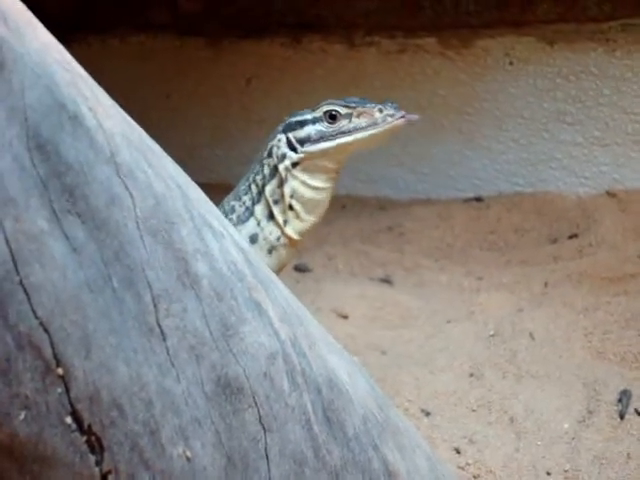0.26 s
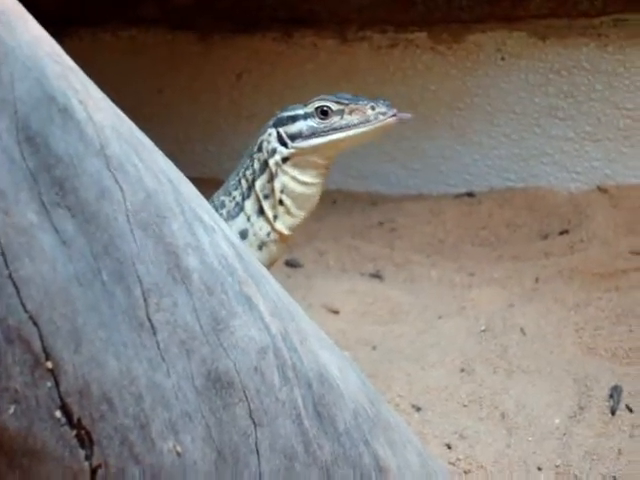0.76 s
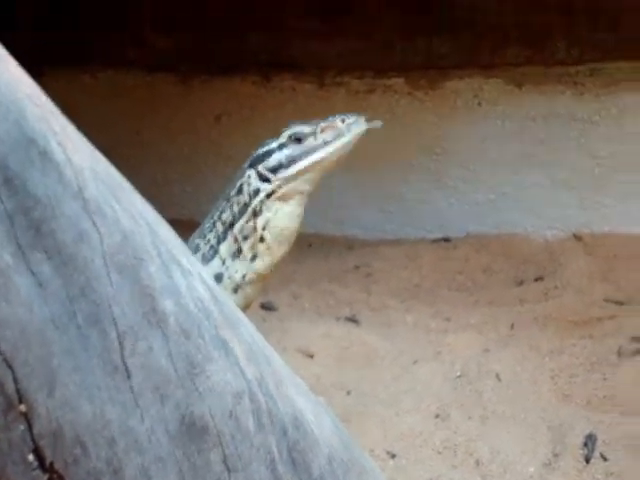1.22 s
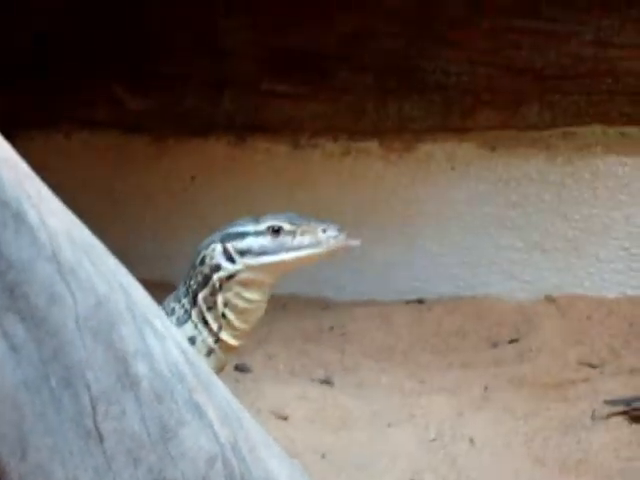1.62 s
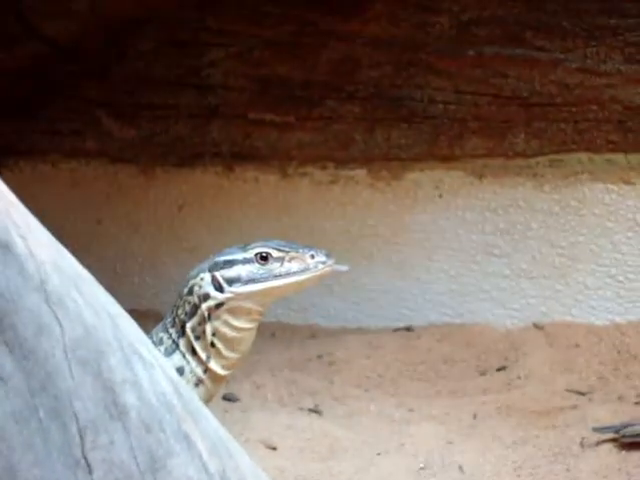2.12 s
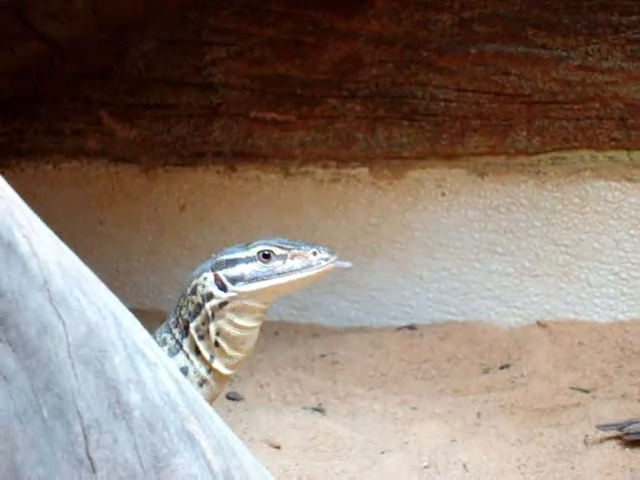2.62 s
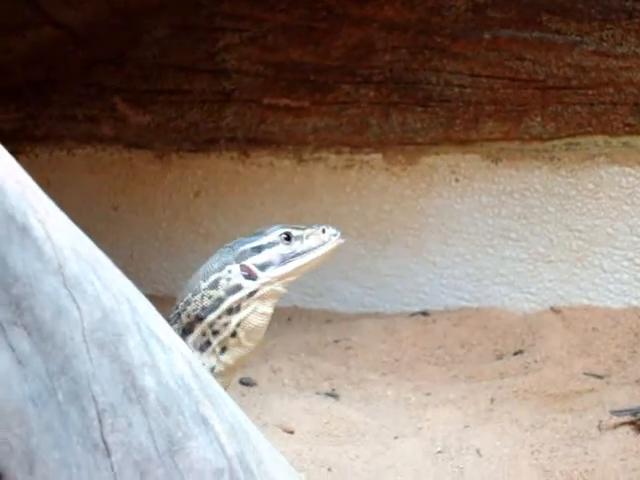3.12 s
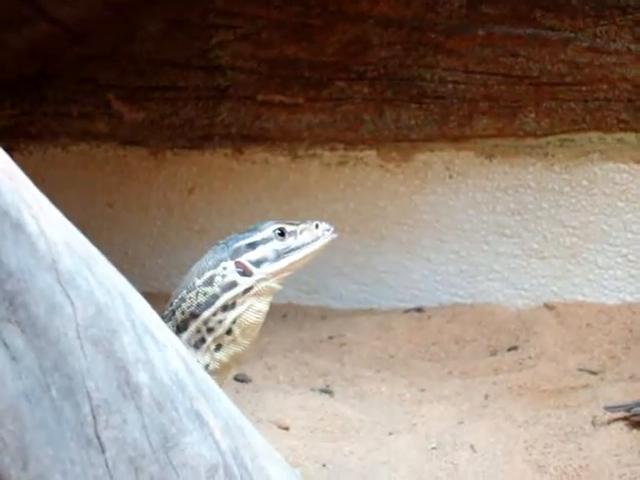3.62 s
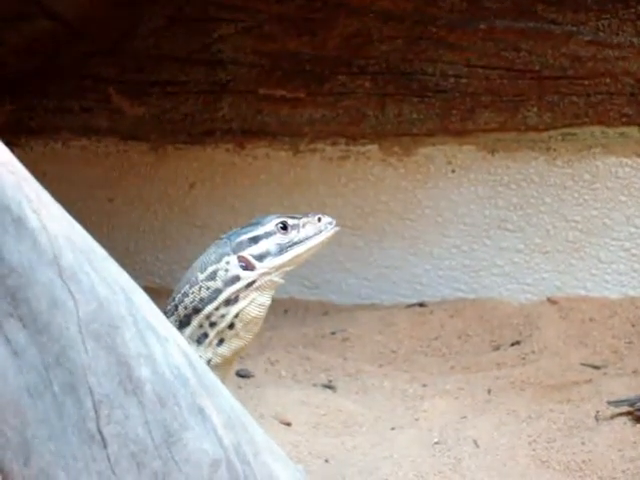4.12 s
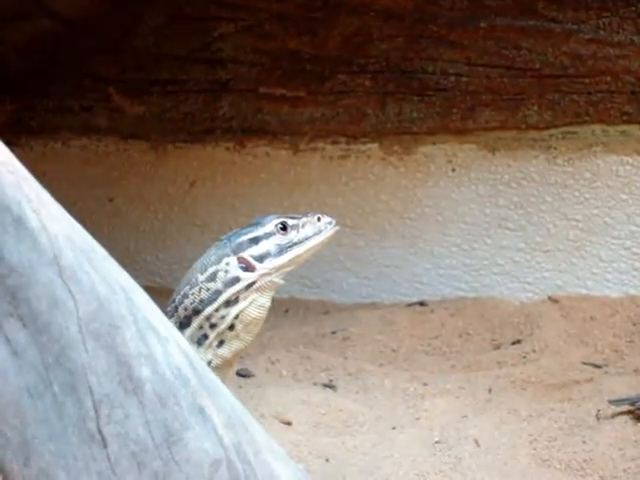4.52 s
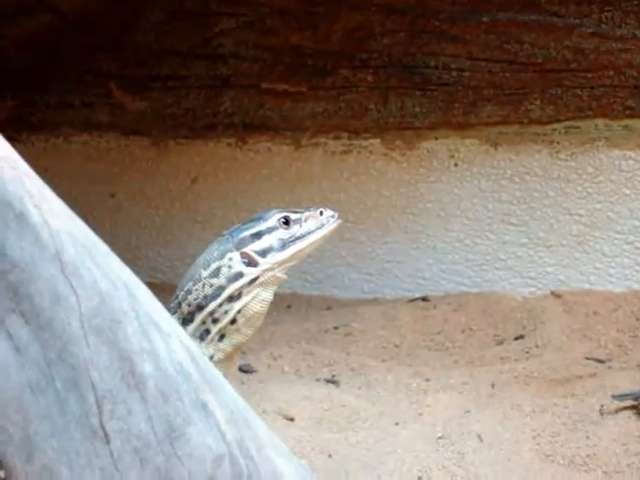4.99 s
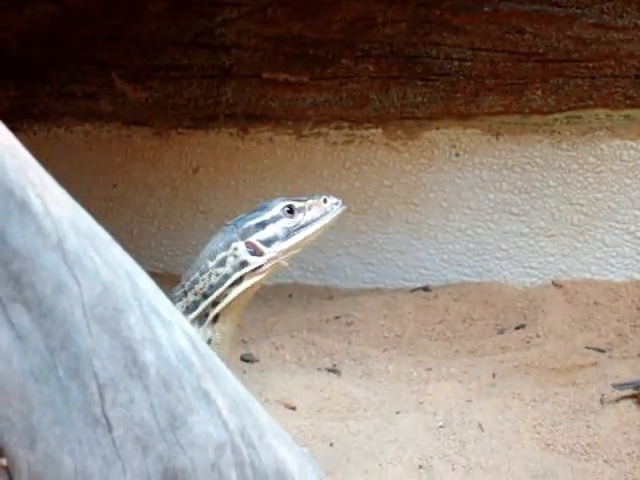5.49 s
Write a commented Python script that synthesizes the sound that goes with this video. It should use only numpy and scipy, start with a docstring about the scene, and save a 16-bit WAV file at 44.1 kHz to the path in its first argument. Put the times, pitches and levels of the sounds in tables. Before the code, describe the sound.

A quiet indoor reptile enclosure with sand and wood, lasting about 5.7 seconds. A close cricket dominates, chirping at about 0.2, 1.0, 1.4, 1.85 (weaker), 2.4, 3.1, 3.7, 4.4, 5.05 and 5.6 seconds. Each chirp is two or three rapid pulses, roughly twenty a second, near 4.9 kilohertz; each pulse glides slightly downward with a fine rasp, the first softer and usually lower. A second, fainter cricket answers at about 0, 0.65, 1.4, 2.2, 2.8, 3.5, 4.1 and 5.1 seconds, its pulses joined by room echo. Still fainter, mostly higher chirps are scattered between, notably around 0.8, 2.5 and 4.4 to 4.7. Soft steady ventilation air continues throughout. Barely noticeable scuffs come near 0.8, 1.2, 1.55 and 5.45. A faint low drone swells between 4.5 and 5.5. The sound is slightly thin and digital, with faint mirrored overtones.

```python
"""A cricket chirps close by in a reptile enclosure, two or three wing strokes at a time: gliding tones with a rasp.
Other crickets chirp farther off in a quiet room, their strokes blurred by a fading tail of noise-like echoes.
Filtered noise and faint tones make the soft ventilation, and narrow noise makes a low drone that swells.
Short bursts of grainy noise scuff faintly on sand and wood.
The recorder holds each sample, which mirrors the chirps into faint higher and lower tones."""
import sys
import numpy as np
from scipy import signal
from scipy.fft import rfft, irfft, next_fast_len
from scipy.io import wavfile
from scipy.ndimage import map_coordinates

SR = 44100
rng = np.random.default_rng(int(sys.argv[2]) if len(sys.argv) > 2 else 0)


def master_out(mix):
    """Clip the mix to full scale and print it as 16-bit PCM to the path in sys.argv[1]."""
    frames = np.transpose(np.atleast_2d(mix))
    ceiling = np.clip(frames, -1, 1)
    pcm = np.round(ceiling * 32767).astype(np.int16)
    wavfile.write(sys.argv[1], SR, pcm)


N = 253575  # length of the scene in samples


def amp(db):
    """Turn decibels into a gain."""
    return 10 ** (np.asarray(db) / 20)


def unit(x):
    """Scale a sound to an rms of 1."""
    return x / np.sqrt(np.mean(x ** 2) + 1e-20)


def add(track, s, sound):
    """Mix a sound into a track from time s, cutting off whatever falls outside."""
    start = round(s * SR)
    sound = sound[max(-start, 0):]
    part = track[max(start, 0):][:len(sound)]
    part += sound[:len(part)]


def wobble(rate, size):
    """A smooth random curve through `rate` random points a second."""
    points = rng.standard_normal(int(size * rate / SR) + 4)
    return map_coordinates(points, [np.arange(size) * rate / SR + 1])


def filtered(x, response):
    """Make each frequency of x louder or softer by the gain response(f)."""
    size = next_fast_len(len(x) + 8192)  # spare room for the filter's ringing
    gain = response(np.fft.rfftfreq(size, 1 / SR))
    return irfft(rfft(x, size) * gain, size)[:len(x)]


# color of the air rush: f/Hz, relative level/dB (per Hz)
AIR_COLOR = [(15, -51), (25, -23), (54, -19.5), (120, -10), (217, -2.5), (458, -0.5), (559, -1.5),
             (811, -2.5), (1590, -6.5), (2090, -7.5), (3430, -10), (4740, -14), (6380, -10.5), (7050, -13),
             (9500, -16), (12400, -31), (20900, -120)]
# fan tones: f/Hz, level/dB
FAN_TONES = [(1491, -70), (2017, -70), (7585, -66)]


def ventilation():
    """A nearly steady rush of air, which is noise, with a few faint, slightly unsteady fan tones."""
    hz, db = np.transpose(AIR_COLOR)

    def color(f):
        level = amp(np.interp(np.log(f + 1), np.log(hz), db))
        return level / np.hypot(1, (f / 10000) ** 20)  # steep fall above 10 kHz

    rush = unit(filtered(rng.standard_normal(N), color))
    tones = np.zeros(N)
    for pitch, level in FAN_TONES:
        rate = pitch + 3 * wobble(12, N)
        tones += amp(level) * unit(np.sin(2 * np.pi * np.cumsum(rate) / SR))
    return amp(-48.5 + 0.44 * wobble(3.16, N)) * rush + tones


DRONE_DB, SWELL_S = -76, 0.075  # steady level; time from a swell's peak to its fall to 1/e
# swells of the building's low drone: t/s (of the peak), level/dB (added to the steady drone)
DRONE_SWELLS = [(4.47, -64), (4.88, -66), (5.17, -65), (5.53, -59.5)]


def drone():
    """A low rumble of noise in a narrow band, which swells a few times."""
    t = np.arange(N) / SR
    level = amp(DRONE_DB)
    for s, db in DRONE_SWELLS:
        level = level + amp(db) * np.exp(-((t - s) / SWELL_S) ** 2)
    # band around 124 Hz
    noise = filtered(rng.standard_normal(N), lambda f: 1 / (1 + ((f - 124) / 14) ** 2))
    return level * unit(noise)


GRIP_S, RELEASE_S = 0.0059, .0012  # the scraper takes hold gradually and lets go at once
# course of one wing stroke: share of its length, tooth rate ratio, relative level/dB
STROKE_COURSE = [(0, 1.045, -11.5), (0.249, 1.025, 0), (.5, .99, 1.5), (.8, .965, 0), (1, 0.955, 0)]


def stroke(length, hz, slip, lumpy_db, glide=1):
    """The scraper runs along the file and slows; uneven tooth strikes make the wing tone waver and flutter."""
    size = int(length * SR)
    u = np.linspace(0, 1, size)  # share of the stroke done
    at, ratio, db = np.transpose(STROKE_COURSE)
    rate = hz * np.interp(u, at, ratio) ** glide * (1 + slip * wobble(806.0, size))
    edges = np.clip(np.minimum(u / GRIP_S, (1 - u) / RELEASE_S) * length, 0, 1)
    flutter = np.tanh(wobble(594, size))
    level = edges * amp(np.interp(u, at, db) + lumpy_db * flutter)
    return unit(level * np.sin(2 * np.pi * np.cumsum(rate) / SR))


def rasp(tone, rasp_db):
    """Broad scraping noise around 4700 Hz that follows the strength of the tone."""
    grit = filtered(rng.standard_normal(len(tone)), lambda f: 1 / np.hypot(1, (f - 4700) / 700))
    strength = np.abs(signal.hilbert(tone))
    return tone + amp(rasp_db) * strength * unit(grit)


def chirp(s, period, hz, db, lead_ratio, lead_db, count):
    """Evenly spaced strokes (s, tooth rate Hz, dB): a hesitant first one, then full ones."""
    first = (s, hz * lead_ratio, db + lead_db)
    return [first] + [(s + k * period, hz, db) for k in range(1, round(count))]


def room(x, t60, wet_db):
    """Direct sound plus a diffuse tail that falls 60 dB in t60 seconds, at about unchanged energy."""
    t = np.arange(int(.7 * SR)) / SR
    build_up = 1 - np.exp(-t / 0.014)
    echoes = rng.standard_normal(len(t)) * amp(-60 * t / t60) * build_up
    tail = signal.fftconvolve(x, echoes)
    heard = amp(wet_db) * tail * np.linalg.norm(x) / np.linalg.norm(tail)
    heard[:len(x)] += x
    return heard / np.hypot(1, amp(wet_db))


def distant_stroke(hz, wet_db):
    """A stroke from farther off, with a smaller glide and a strong flutter, blurred by the room."""
    tone = stroke(0.0317, hz, slip=0.022, lumpy_db=9, glide=0.33)
    return room(rasp(tone, rasp_db=-19.5), t60=0.4, wet_db=wet_db)


SECOND_LEAD_RATIO, SECOND_LEAD_DB = 0.94, -12.5  # its first stroke is slower and barely sounded
# three-stroke chirps of a second cricket farther off:
# t/s, stroke period/s, tooth rate f/Hz, level/dB, room over direct sound level/dB
SECOND_CRICKET_CHIRPS = [(-.046, 0.041, 4860, -29.5, 0.5), (.649, .05, 4883, -30, -5),
                         (1.36, 0.061, 4907, -33.5, -2), (2.163, 0.059, 4833, -32.5, -3),
                         (2.757, .053, 4856, -31.5, 0.5), (3.452, .05, 4880, -32.5, -0.5),
                         (4.062, 0.05, 4843, -33, 1.5), (5.108, 0.049, 4844, -33.5, 2)]


def second_cricket():
    """A faint lead-in and two full strokes, which the room joins into one trill."""
    song = np.zeros(N)
    for start, period, pitch, level, wet_db in SECOND_CRICKET_CHIRPS:
        for s, hz, db in chirp(start, period, pitch, level, SECOND_LEAD_RATIO, SECOND_LEAD_DB, count=3):
            add(song, s, amp(db) * distant_stroke(hz, wet_db))
    return song


# reflections inside the enclosure: delay t/s (before a small random shift), level/dB (against direct sound)
WALL_ECHOES = [(.0029, -15.5), (.0061, -13.5), (.0094, -11), (0.0125, -5.5)]


def walls(x):
    """Close walls return late copies, which beat with the gliding tone and break it into a fine rasp."""
    heard = np.pad(x, (0, SR // 50))
    for delay, db in WALL_ECHOES:
        add(heard, delay + rng.normal(0, .0003), amp(db) * x)
    return heard * np.linalg.norm(x) / np.linalg.norm(heard)  # same energy as before


LEAD_S, STROKE_S = .0185, .0255  # length of the first stroke and of the full ones
REOPEN_S, REOPEN_DB = .011, -8  # the wings reopen this long after a stroke, with a weak blip
# chirps of the near cricket, whose first stroke is slower and softer:
# t/s, wing strokes, stroke period/s, middle tooth rate f/Hz, level/dB,
# first stroke's rate ratio, first stroke's relative level/dB
NEAR_CRICKET_CHIRPS = [(.235, 3, 0.047, 5003, -24.5, 0.91, -6), (1.010, 2, 0.044, 4880, -24.5, .96, -3.5),
                       (1.398, 2, 0.05, 4910, -22.5, .96, -5.5), (1.847, 3, .044, 4895, -28.5, .995, -9.5),
                       (2.407, 3, 0.048, 4880, -24, 0.93, -7.5), (3.075, 3, 0.049, 4886, -25, 0.95, -7),
                       (3.662, 3, .0515, 4890, -24.5, 0.95, -4), (4.367, 3, .0515, 4880, -24, 0.98, -5),
                       (5.044, 3, .0495, 4872, -24, .945, -7.5), (5.635, 2, 0.048, 4860, -24, 0.97, -4)]


def near_cricket():
    """Each closing sounds both wings, which beat into a rasp; their reopening adds a short weak blip."""
    song = np.zeros(N)
    for start, count, period, pitch, level, lead_ratio, lead_db in NEAR_CRICKET_CHIRPS:
        strokes = chirp(start, period, pitch, level, lead_ratio, lead_db, count=count)
        for k, (s, hz, db) in enumerate(strokes):
            length = STROKE_S if k else LEAD_S
            # the two wings sound slightly apart in pitch
            file_wing = stroke(length, .987 * hz, slip=.022, lumpy_db=3)
            scraper_wing = stroke(length, 1.022 * hz, slip=.022, lumpy_db=3, glide=.3)
            closing = walls(unit(file_wing + amp(0.5) * scraper_wing))
            opening = stroke(.006, hz, slip=.022, lumpy_db=7, glide=.3)
            add(song, s, amp(db) * rasp(closing, rasp_db=-25))
            add(song, s + length + REOPEN_S, amp(db + REOPEN_DB) * opening)
    return song


# stroke period, change from stroke to stroke, room over direct sound
FAR_PERIOD_S, FAR_FADE_DB, FAR_WET_DB = .053, -1.4, 0.5
# chirps of the farthest, higher crickets: t/s, wing strokes, tooth rate f/Hz, level/dB (of the first stroke)
FAR_CRICKET_CHIRPS = [(.35, 1, 5310, -39.5), (.555, 2, 5090, -49), (.828, 2, 5070, -36.5),
                      (1.425, 1, 5340, -39), (1.67, 2, 5096, -38.5), (1.89, 1, 5470, -41.5),
                      (2.528, 3, 5205, -36), (3.456, 1, 5160, -38.5), (4.357, 1, 5310, -34.5),
                      (4.51, 2, 5050, -37.5), (4.652, 2, 5620, -38.5)]


def far_crickets():
    """Short chirps that fade from stroke to stroke, with slightly more room than direct sound."""
    song = np.zeros(N)
    for s, count, hz, db in FAR_CRICKET_CHIRPS:
        for k in range(round(count)):
            sound = distant_stroke(hz, FAR_WET_DB)
            add(song, s + k * FAR_PERIOD_S, amp(db + k * FAR_FADE_DB) * sound)
    return song


def radiated(song, edge_hz):
    """Small wings radiate poorly just below their resonance, so the song is cut there."""
    return filtered(song, lambda f: 1 / np.hypot(1, (edge_hz / np.maximum(f, 4100)) ** 16))


# faint scuffs and taps: t/s, length/s, center f/Hz, level/dB
SCUFF_EVENTS = [(0.797, .04, 2300, -52), (1.184, 0.045, 2670, -49), (1.552, 0.014, 7500, -49),
                (5.43, 0.048, 7000, -51), (5.484, .05, 7000, -53)]


def scuffs():
    """Short grainy rubs on sand and wood: noise of uneven strength around a center frequency."""
    track = np.zeros(N)
    for s, length, hz, db in SCUFF_EVENTS:
        size = int(length * SR)
        graininess = amp(2.22 * wobble(510, size))
        grains = rng.standard_normal(size) * graininess * signal.windows.tukey(size, .5)
        rub = filtered(grains, lambda f: (f * hz / (f * f + hz * hz)) ** 3 * (f < 10000))
        add(track, s, amp(db) * unit(rub))
    return track


def scene():
    """All sources at one microphone."""
    background = ventilation() + drone()
    second = second_cricket()
    near = room(near_cricket(), t60=.3, wet_db=-21)[:N]
    crickets = radiated(second + near + far_crickets(), edge_hz=4320)
    return (background + crickets + scuffs())[None]


HOLD_HZ, TOP_HZ = 32000, 15900  # the recorder's own sample rate; the top of its band


def record(dry):
    """The recorder holds each of its samples until the next, which mirrors strong tones; then its band limit."""
    slow = signal.resample_poly(dry[0], HOLD_HZ, SR)
    held = slow[np.arange(N) * HOLD_HZ // SR]
    return filtered(held, lambda f: f < TOP_HZ)[None]


dry = scene()
out = record(dry)
master_out(out)
```